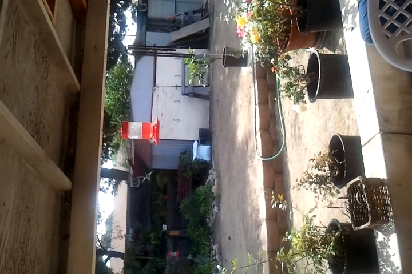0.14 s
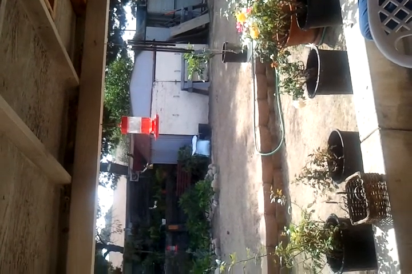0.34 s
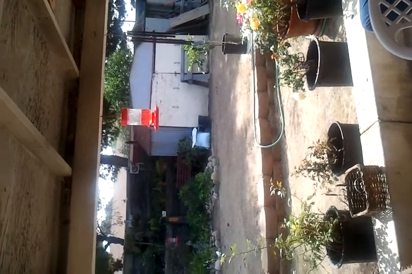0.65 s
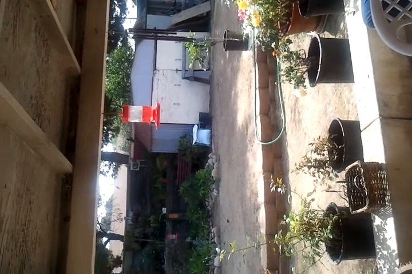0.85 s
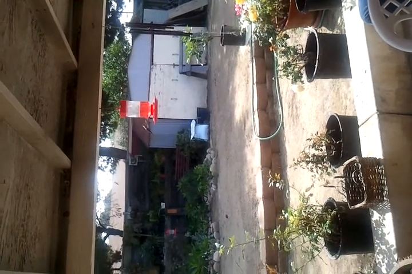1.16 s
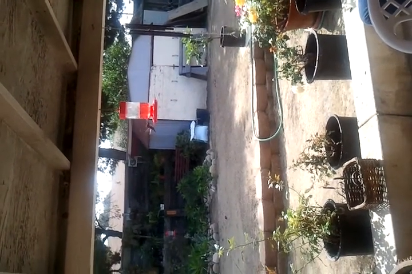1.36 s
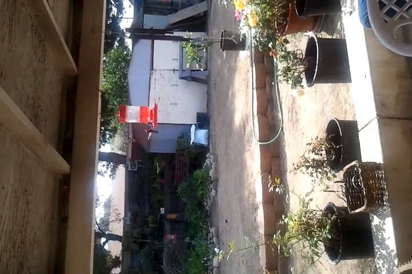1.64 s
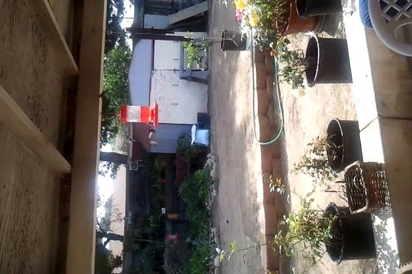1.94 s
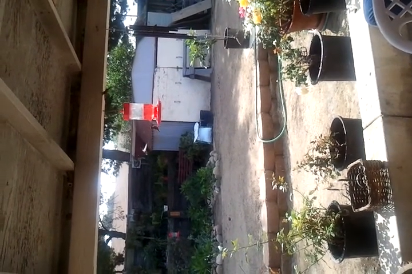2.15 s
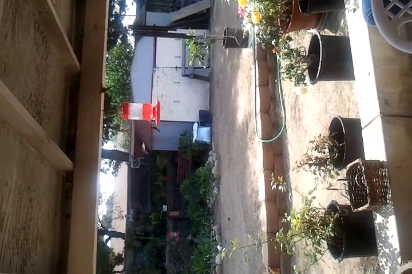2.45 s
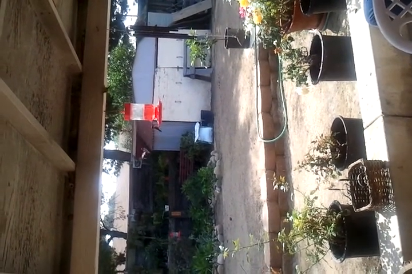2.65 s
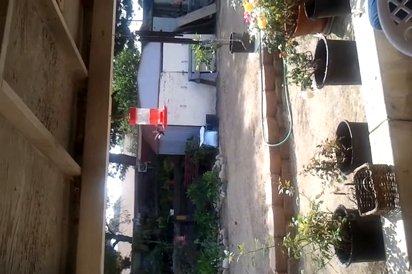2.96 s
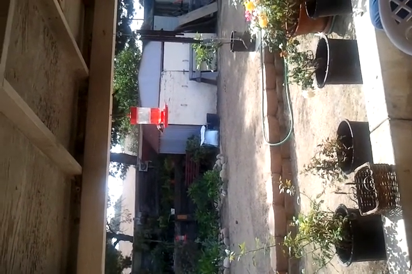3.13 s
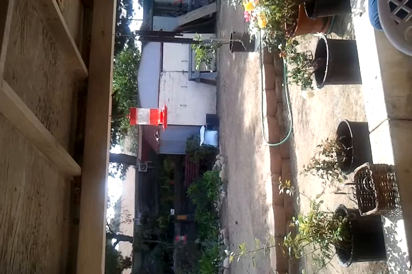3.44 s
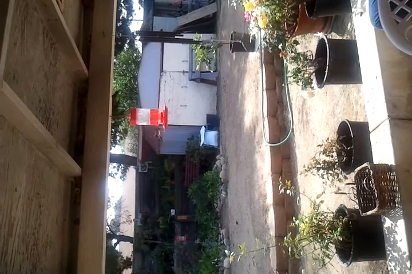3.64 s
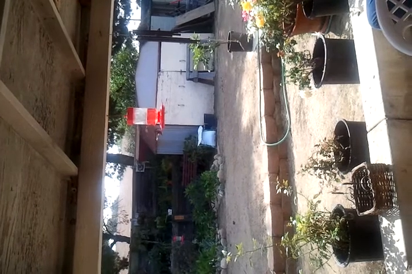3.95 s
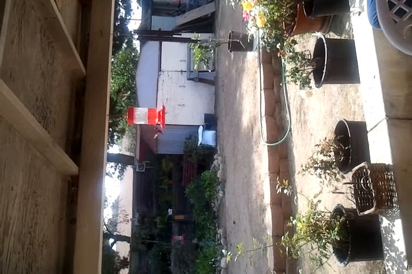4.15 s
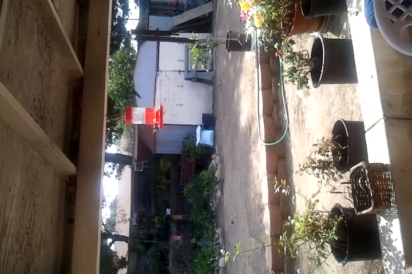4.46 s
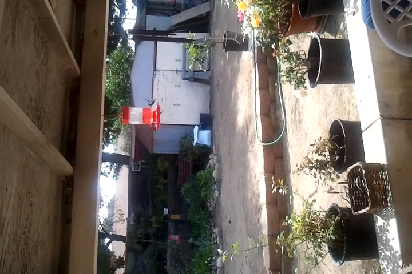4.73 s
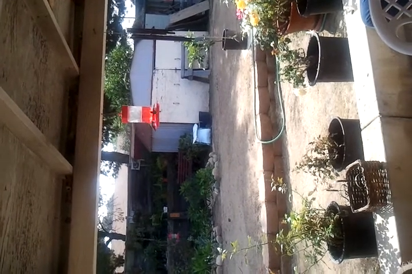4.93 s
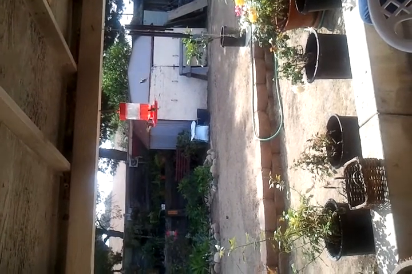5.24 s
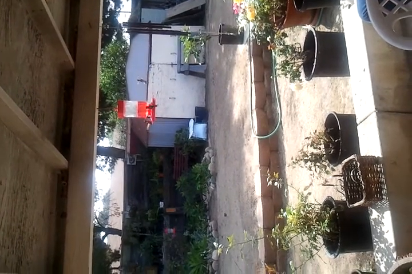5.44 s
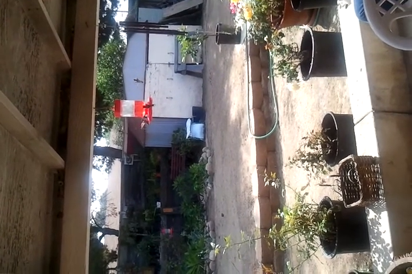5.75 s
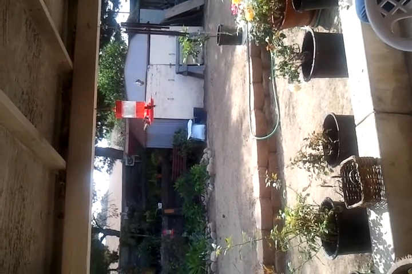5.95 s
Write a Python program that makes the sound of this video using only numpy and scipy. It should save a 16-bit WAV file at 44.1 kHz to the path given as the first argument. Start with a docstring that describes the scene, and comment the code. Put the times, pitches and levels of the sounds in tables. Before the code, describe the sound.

Hummingbirds call around a backyard feeder, heard from under a wooden porch roof. Each call is a very short, sharp, high chip, slightly raspy, with a brief echo off nearby walls. Clear chips come right at the start and at 0.6 seconds, then a quick run of three around 1.5 seconds. A thin rising squeak just before 2 seconds leads into two strong chips. More follow at about 2.3 and 2.7 seconds, with a pair at 3. After that they are softer and more scattered, near 3.5, 4.2, 4.7, 5.3 and 6 seconds. Throughout, a low rumbling breeze with soft gusts and light hiss blends with the drone of distant traffic, slowly rising and falling and easing a little toward the end. Faint far-off chirps sound in the first half second or so, and tiny dry ticks come near 0.3, 2.9 and 3.4 seconds.

```python
"""Hummingbirds at a backyard feeder

Microphone under a wooden porch roof, the birds chipping at each other near and far. Each chip is a
short lead note and a quick whip of pitch, scattered by the porch and the yard walls; one bird adds a
thin squeak. Behind them are a rumbling breeze with soft gusts, the drone of distant traffic, a few
dry ticks and far-off chirps. The level of breeze and traffic slowly rises and falls as a whole."""
import sys
import numpy as np
from scipy import signal
from scipy.fft import rfft, irfft, next_fast_len
from scipy.io import wavfile
from scipy.ndimage import map_coordinates

SR = 44100
rng = np.random.default_rng(int(sys.argv[2]) if len(sys.argv) > 2 else 0)


def bounce(signal):
    """Save signal as a 16-bit WAV file at the path given by the first command-line argument."""
    frames = np.transpose(np.atleast_2d(signal))
    limited = np.clip(frames, -1, 1)
    pcm = np.round(limited * 32767).astype(np.int16)
    wavfile.write(sys.argv[1], SR, pcm)


N = 268569

# slow rise and fall of the whole background's level: time_s, level_db
BACKGROUND_LEVEL = [(0, 1.5), (.5, 1), (1.2, 1), (1.9, -2), (2.25, 1.5), (2.6, -1), (3.4, 1), (3.8, -1.26),
                    (4.35, -0.4), (4.6, -2), (5.1, -4), (5.55, -0.7), (6.09, -3.5)]
# gusts crossing the yard: peak_s, half_length_s, swell_db, rush_db
GUST_EVENTS = [(0.093, 0.2, -41, -57), (0.853, 0.1, -45, -64), (1.706, 0.09, -44.5, -74),
               (2.147, 0.047, -43, -60), (3.17, 0.065, -45, -61), (3.374, 0.15, -51, -52),
               (4.042, 0.1, -48, -57), (5.356, 0.13, -48, -71)]
# spectra of the wind's rumble, soft swells and hiss: frequency_hz, level_db
RUMBLE_SPECTRUM = [(5, -4), (16, -6.5), (27, 0.5), (38, -1), (52, 1), (68, -4.5), (100, -13), (160, -17),
                   (400, -50.5)]
SWELL_SPECTRUM = [(90, -1), (150, -1.5), (200, 4), (228, -3), (266, 5), (300, -1), (400, -4.5), (500, -8),
                  (700, -18), (1200, -28.5), (3000, -34)]
HISS_SPECTRUM = [(200, 5.5), (700, 8), (1200, 5), (2000, 1.5), (3500, -0.5), (5000, -1.5), (6600, -2.5),
                 (7300, -12), (8000, -37.5)]
# resonances of distant traffic: centre_hz, width_hz, level_db
TRAFFIC_RESONANCES = [(97.2, 10.6, 1.5), (121.7, 17, -3.5), (148, 28, -10)]
# moments when the traffic grows louder: peak_s, half_length_s, level_db
TRAFFIC_SURGES = [(.79, 0.043, -41), (3.48, 0.18, -40), (5.36, 0.073, -47.5)]
# decay of the yard's echo: frequency_hz, t60_s
YARD_DECAY = [(500, 0.052), (2500, 0.16), (6000, 0.28), (9000, 0.2)]
# small dry ticks: start_s, level_db, relative_echo_db
TICK_EVENTS = [(0.279, -52, -4), (0.2832, -47, -11), (2.9368, -42.5, -2), (2.9385, -52, -9),
               (3.4141, -46, -10.5)]
# spectrum of a tick: frequency_hz, level_db
TICK_SPECTRUM = [(500, -32.5), (1500, -12), (4600, 0.5), (7000, -2.5), (9000, -25)]
# far-off chirps: peak_s, pitch_hz, level_db
FAR_CHIRPS = [(0.028, 1616, -53.5), (.105, 3730, -53.5), (.41, 1308, -57), (.575, 3502, -60.5),
              (5.91, 3440, -63.5)]
# the rising squeak and the high edge that opens it: time_s, pitch_hz, level_db
SQUEAK_CONTOUR = [(1.933, 4900, -63), (1.948, 5080, -45.5), (1.961, 5240, -47), (1.976, 5750, -49)]
EDGE_CONTOUR = [(1.928, 7000, -61), (1.935, 7100, -57), (1.941, 6850, -61), (1.955, 6930, -60)]
# chips around the feeder: peak_s, level_db, low_start_db, lead_db, lead_stretch
CHIP_CALLS = [(0.0813, -33, -12.5, -1.5, 1.1), (0.4813, -54, -16, -17, 1.2),
              (0.647, -32.5, -20, -2.5, 0.99), (1.0153, -50.5, -12, -8, 0.92),
              (1.2126, -41, -9.5, -8.5, 1.15), (1.5073, -42, -17, 1, 0.78),
              (1.5636, -38.5, -10.5, -13.5, 0.87), (1.6362, -37, -8.5, -18, .9),
              (2.0278, -34, -14.5, -1.5, 0.91), (2.1013, -33, -10, -5, 1.2),
              (2.3468, -42.5, -4, -3.5, 1.13), (2.6632, -38.5, -9, -0.5, 1.05),
              (3.0013, -42, -15.5, 3.5, 1.14), (3.0588, -34, -12.5, -4.5, .8),
              (3.4726, -42.5, -11, -1.5, 0.97), (3.85, -52.5, -7.5, -10, 0.75),
              (3.97, -46.5, -13, -10, 0.96), (4.1563, -38, -19, -1, 0.73), (4.668, -41.5, -17.5, -4, 0.73),
              (4.7335, -42.5, -15.5, -16, .8), (4.916, -56.5, -11, -4, 0.84), (5.341, -41, -15.5, -1, .75),
              (6.0461, -36.5, -18.5, -4, 0.76)]
# a chip's lead note and whip: time_from_peak_s, pitch_hz, level_db, low_start_weight
LEAD_CONTOUR = [(-.014, 7080, -13.5, 0.1), (-.0100, 6630, -7, 0.1), (-.0085, 5580, 6, 0.9),
                (-.0065, 6570, 3, 0.6), (-.005, 6890, 7.5, .3), (-.0035, 6730, 4.5, .3),
                (-.002, 6130, -7, 0.1)]
WHIP_CONTOUR = [(-.003, 1210, -9, 1), (-.002, 1910, 6, 1), (-.001, 3900, 4.5, 0.5),
                (-.0004, 6700, 5.5, 0.1), (.0012, 5980, 5.5, 0.1), (.0026, 5220, 1.5, 0.9),
                (.004, 4240, -20, 0.5)]
# spectrum of the rasp in a chip: frequency_hz, level_db
RASP_SPECTRUM = [(600, -14), (1200, -8.5), (2200, -6.5), (3500, -5), (5000, -5), (6800, -9), (9000, 0.5)]
# the recorder's steep treble edge: frequency_hz, gain_db
RECORDER_RESPONSE = [(7000, 0), (7400, -5.5), (7700, -19), (8000, -35), (8600, -26), (9300, -52),
                     (10000, -120)]


def amp(db):
    return 10 ** (np.asarray(db) / 20)


def unit_rms(x):
    return x / np.sqrt(np.mean(x ** 2) + 1e-20)


def along(points, hz):
    """Read (frequency_hz, value) points on a log axis."""
    f, v = np.transpose(points)
    return np.interp(np.log(hz + 1), np.log(f + 1), v)


def wobble(knots_per_s, size=N):
    """A smooth random curve."""
    knots = rng.standard_normal(int(size * knots_per_s / SR) + 4)
    return map_coordinates(knots, [np.arange(size) * knots_per_s / SR])


def filtered(x, response):
    """Shape x by a gain that depends on frequency."""
    size = next_fast_len(len(x) + 8192)
    return irfft(rfft(x, size) * response(np.fft.rfftfreq(size, 1 / SR)), size)[:len(x)]


def noise(spectrum, size=N):
    """Coloured noise of rms 1."""
    return unit_rms(filtered(rng.standard_normal(size), lambda hz: amp(along(spectrum, hz))))


def add(track, start_s, x):
    i = max(round(start_s * SR), 0)
    track[i:i + len(x)] += x[:max(N - i, 0)]


def humps(rows):
    """Summed power of bell-shaped rises and falls: peak_s, half_length_s, level_db."""
    t = np.arange(N) / SR
    return sum(amp(db) ** 2 * np.exp(-((t - s) / half_s) ** 2) for s, half_s, db in rows)


def lifted(db, power):
    """Amplitude of a level with extra power added."""
    return np.sqrt(amp(db) ** 2 + power)


def whistle(t, times, hz, db, flutter):
    """A tone gliding through the given points, its pitch fluttering at random."""
    pitch = np.interp(t, times, hz) * (1 + flutter * wobble(2495, len(t)))
    level = amp(np.interp(t, times, db)) * (t >= times[0]) * (t <= times[-1])
    return np.sqrt(2) * level * np.sin(2 * np.pi * (np.cumsum(pitch) / SR + rng.random()))


def echoes(x, porch_t60_s=.06, yard_db=2.0, gap_s=.003, bounces=14):
    """Distinct bounces off the porch and the diffuse tail of the yard, by new paths each time."""
    hz, t, spectra = signal.stft(rng.standard_normal(SR // 2), SR, nperseg=256)
    decay = amp(-60 * t / along(YARD_DECAY, hz)[:, None])
    yard = signal.istft(spectra * decay, SR, nperseg=256)[1]
    delay_s = (np.arange(bounces) + rng.random(bounces)) / bounces * porch_t60_s / 2
    strength = rng.choice([-1, 1], bounces) * amp(-60 * delay_s / porch_t60_s)
    porch = np.bincount((delay_s * SR).astype(int), strength, len(yard))
    response = porch / np.linalg.norm(porch) + amp(yard_db) * yard / np.linalg.norm(yard)
    return signal.fftconvolve(x, np.pad(response, (int(gap_s * SR), 0)))


def distant_traffic(background_db):
    """A low drone of resonant noise, surging now and then."""
    def resonances(hz):
        return np.sqrt(sum(amp(db) ** 2 / (1 + (2 * (hz - centre) / width) ** 2) ** 2
                           for centre, width, db in TRAFFIC_RESONANCES))
    drone = unit_rms(filtered(rng.standard_normal(N), resonances))
    return lifted(-45 + 1.1 * background_db, humps(TRAFFIC_SURGES)) * drone


def breeze(background_db):
    """Moving air rumbles, swells and hisses across the yard; gusts lift the swells and the hiss."""
    gust_power = humps([(s, half_s, db) for s, half_s, db, _ in GUST_EVENTS])
    rumble = amp(-43 + 1.7 * background_db + .8 * wobble(6)) * noise(RUMBLE_SPECTRUM)
    swell_gain = lifted(-48.5 + 1.25 * background_db, gust_power) * amp(.99 * wobble(11))
    swell = swell_gain * noise(SWELL_SPECTRUM)
    hiss = lifted(-55.5 + background_db, amp(-14.5) ** 2 * gust_power) * noise(HISS_SPECTRUM)
    return rumble + swell + hiss


def gusts(hz=457):
    """Each gust brings a soft rush of air, about an octave wide."""
    rush = noise([(hz / 4, -40), (hz * .62, -4), (hz, 0), (hz * 1.1, -7), (hz * 4, -45), (hz * 8, -90)])
    power = humps([(s, half_s, db) for s, half_s, _, db in GUST_EVENTS])
    return np.sqrt(power) * rush


def far_chirps(half_s=.024):
    """Short hoarse notes from far off that reach the microphone only as echoes."""
    out, t = np.zeros(N), np.arange(SR // 12) / SR
    for peak_s, hz, db in FAR_CHIRPS:
        pitch_hz = hz * np.array([.92, 1, 1.04])
        level_db = db + np.array([-10, 0, -12])
        note = whistle(t, half_s * np.arange(3), pitch_hz, level_db, flutter=.18)
        add(out, peak_s - half_s, echoes(note))
    return out


def ticks(t60_s=.0049):
    """Tiny dry clicks, each with a fainter echo."""
    out, t = np.zeros(N), np.arange(SR // 100) / SR
    for start_s, db, echo_db in TICK_EVENTS:
        click = amp(db + 5.5 - 60 * t / t60_s) * noise(TICK_SPECTRUM, len(t))
        add(out, start_s, click)
        add(out, start_s, amp(echo_db) * echoes(click))
    return out


def squeak():
    """One bird's upward whistle under a brief high edge, blurred by the yard."""
    out, start_s = np.zeros(N), EDGE_CONTOUR[0][0]
    t = start_s + np.arange(SR // 16) / SR
    call = whistle(t, *np.transpose(SQUEAK_CONTOUR), flutter=.015)
    call += whistle(t, *np.transpose(EDGE_CONTOUR), flutter=.043)
    add(out, start_s, call)
    add(out, start_s, amp(-5) * echoes(call, yard_db=0))
    return out


def chip(low_start_db, lead_db, lead_stretch):
    """A lead note, then a whip up in pitch and back, 15-20 ms in all and half broken into rasp."""
    t = np.arange(-SR // 50, SR // 100) / SR
    call = np.zeros(len(t))
    for contour, note_db, stretch in ((WHIP_CONTOUR, 0, 1), (LEAD_CONTOUR, lead_db, lead_stretch)):
        times, hz, level_db, low_weight = np.transpose(contour)
        times = times * stretch
        hz = hz * (1 + .015 * rng.standard_normal())  # no two calls have quite the same pitch
        tone_db = note_db - 7 + level_db + low_weight * (low_start_db + 3.5)
        call += whistle(t, times, hz, tone_db, flutter=.1)
        # the rasp lasts as long as the note, and is fuller when the call starts low
        rasp = noise(RASP_SPECTRUM, len(t))
        rasp = filtered(rasp, lambda f: amp((low_start_db + 8) * along([(4000, .88), (6000, 0)], f)))
        call += amp(note_db + np.interp(t, times, level_db, -80, -80)) * rasp
    return call


def hummingbirds(near_db=-34.5, walls=3):
    """Chips arrive directly and off the walls, each path with its own grain."""
    out = np.zeros(N)
    for peak_s, db, *voice in CHIP_CALLS:
        start_s = peak_s - .02
        echo_db = -10.5 + .22 * (near_db - db)  # fainter birds are farther off, so wetter
        add(out, start_s, amp(db) * chip(*voice))
        for _ in range(walls):
            add(out, start_s, amp(db + echo_db) * echoes(chip(*voice)))
    return out


def scene():
    """The yard and its birds from one microphone under the porch roof."""
    background_db = np.interp(np.arange(N) / SR, *np.transpose(BACKGROUND_LEVEL))
    background = distant_traffic(background_db) + breeze(background_db) + gusts()
    return (background + far_chirps() + ticks() + squeak() + hummingbirds())[None]


def record(dry):
    """The recorder cuts steeply above 7 kHz, and its zero sits a little low and drifts."""
    offset = np.linspace(-.145, -.095, N)
    return np.array([filtered(x, lambda hz: amp(along(RECORDER_RESPONSE, hz))) for x in dry]) + offset


dry = scene()
out = record(dry)
bounce(out)
```